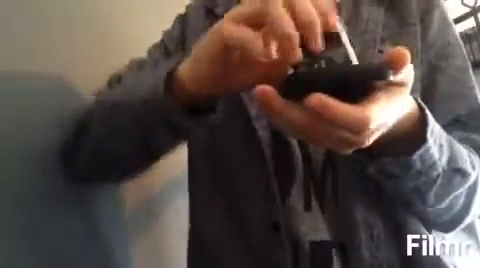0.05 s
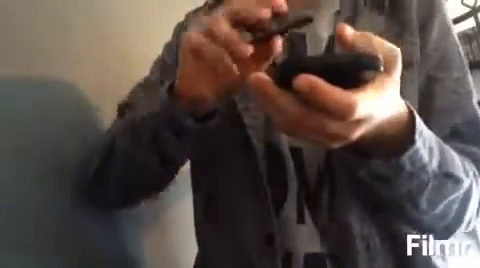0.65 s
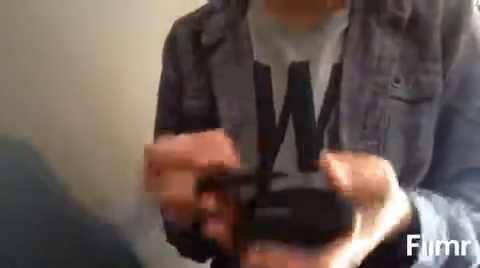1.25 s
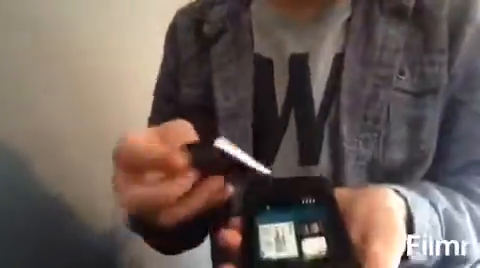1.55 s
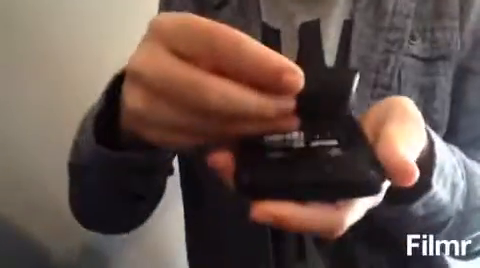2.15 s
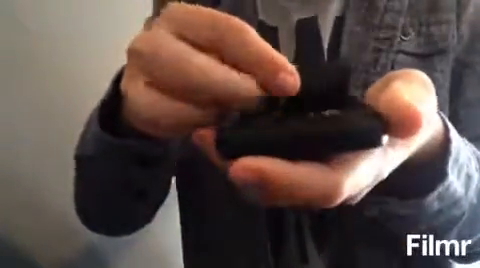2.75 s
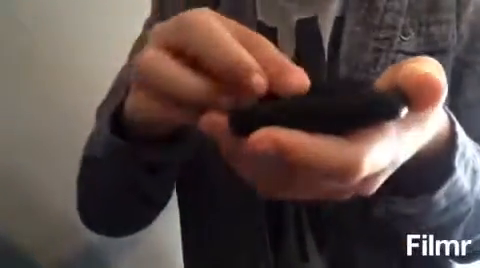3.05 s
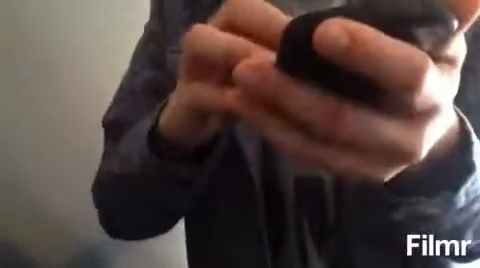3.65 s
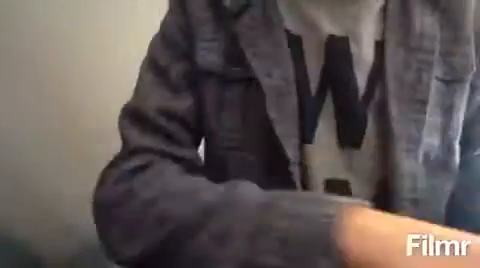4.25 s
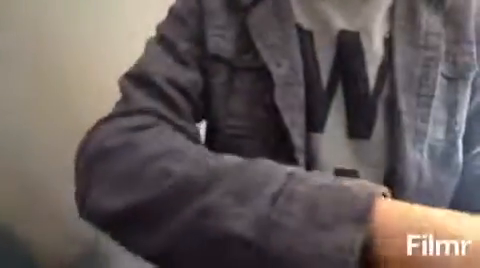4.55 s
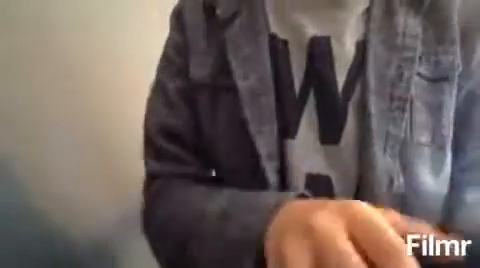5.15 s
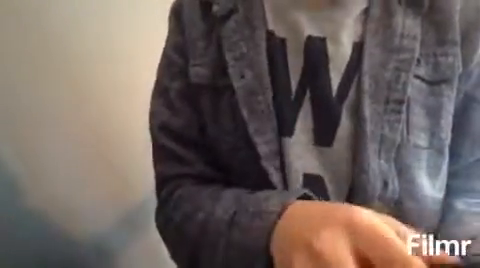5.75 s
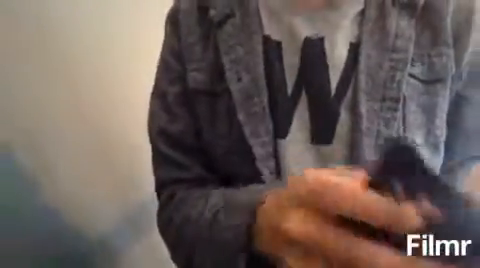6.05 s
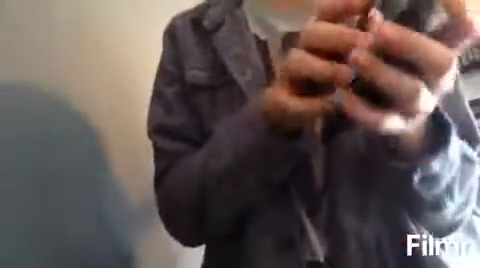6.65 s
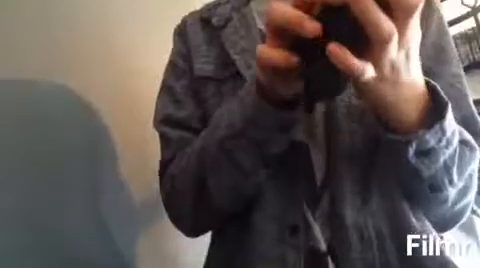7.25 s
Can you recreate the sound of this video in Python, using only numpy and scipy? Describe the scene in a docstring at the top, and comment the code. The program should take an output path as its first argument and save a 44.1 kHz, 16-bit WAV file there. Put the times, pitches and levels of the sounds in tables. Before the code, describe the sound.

Hands handle a phone close to the microphone in a small room, over faint steady hiss and rumble. A light plastic tick comes right at the start. The back cover snaps into place at about 1.1, 2.5, 3.1 and 3.4 seconds, with small ticks between and a duller click near 2.7. From 4.2 to 5 seconds a sleeve rustles faintly, an arm bumps the table softly at 4.4, and fingernails graze the plastic around 4.9. At about 5.15 the phone lands with a loud knock and quick clatter, the loudest moment, while its case scrapes across the table in jerky, rattling pulls. Softer scrapes and bumps continue until about 6 seconds. The hiss dips after the knocks and slowly recovers. From 6.7 to 7.4 seconds there are a few light finger grazes and plastic clicks.

```python
"""In a small room, hands press the back cover of a phone until its catches snap and ring its modes.
Plastic contacts tick, a sleeve rustles by friction, fingers graze the shell and an arm bumps a table.
The phone lands and excites the table's modes; its case is dragged off the top in stick-slip motion.
The walls reflect these sounds over a floor of hiss and rumble. A gain control lowers everything,
hiss included, after the loud knocks and slowly recovers."""
import sys
import numpy as np
from scipy import signal
from scipy.fft import rfft, irfft, next_fast_len
from scipy.io import wavfile

SR = 44100
rng = np.random.default_rng(int(sys.argv[2]) if len(sys.argv) > 2 else 0)


def int16_out(signal):
    """Quantize to a 16-bit WAV file."""
    q = np.round(np.clip(np.atleast_2d(signal).T, -1, 1) * 32767)
    wavfile.write(sys.argv[1], SR, q.astype(np.int16))


N = 330309
TIME = np.arange(N) / SR
HIT_TIME = TIME[:16384]


def undb(db):
    """Decibels to amplitude ratio."""
    return 10 ** (np.asarray(db) / 20)


def unit(x):
    """Normalisation to rms 1."""
    return x / np.sqrt(np.mean(x ** 2))


def add(out, s, x):
    """Superposition: x joins out at time s."""
    i = int(s * SR)
    out[i:i + len(x)] += x[:N - i]


def colour(x, points):
    """Minimum-phase filter through (frequency [Hz], gain [dB]) points; white noise keeps its power."""
    size = 4096
    hz, db = np.transpose(points)
    bin_hz = np.arange(size // 2 + 1) * SR / size
    gain = undb(np.interp(np.log(bin_hz + 1), np.log(hz), db))
    cepstrum = irfft(np.log(unit(gain)))
    cepstrum[1:size // 2] *= 2  # folding the cepstrum makes the filter causal
    cepstrum[size // 2 + 1:] = 0
    return signal.fftconvolve(x, irfft(np.exp(rfft(cepstrum))))[:len(x)]


def lowpass(x, hz, order=2):
    """Maximally flat low-pass."""
    return signal.sosfilt(signal.butter(order, min(hz, SR / 2 - 1), fs=SR, output="sos"), x)


def highpass(x, hz, order=2):
    """Maximally flat high-pass."""
    return signal.sosfilt(signal.butter(order, hz, "high", fs=SR, output="sos"), x)


def shelves(x, low_db, high_db, low_hz=1000, high_hz=3200):
    """Zero-phase shelving: bass and treble are scaled about an unchanged middle band."""
    size = next_fast_len(len(x) + 2048)
    hz, spectrum = np.arange(size // 2 + 1) * SR / size, rfft(x, size)
    low, below = (irfft(spectrum / (1 + (hz / edge) ** 6), size)[:len(x)] for edge in (low_hz, high_hz))
    return low * undb(low_db) + below - low + (x - below) * undb(high_db)


def resonate(x, peaks):
    """Forced vibration: x drives resonances of (frequency [Hz], bandwidth [Hz], gain [dB])."""
    return sum(undb(db) * signal.lfilter(*signal.iirpeak(hz, hz / width, fs=SR), x)
               for hz, width, db in peaks)


def ring(modes, pitch=1):
    """Free vibration: modes struck once decay exponentially."""
    return sum(undb(db) * np.sin(2 * np.pi * hz * pitch * HIT_TIME)
               * np.exp(-np.log(1000) * HIT_TIME / t60) for hz, t60, db in modes)


def crack(fall_s):
    """Exponential decay: a burst of noise that dies away, with energy 1."""
    burst = rng.standard_normal(len(HIT_TIME)) * np.exp(-HIT_TIME / fall_s)
    return burst / np.linalg.norm(burst)


def grains(rate, spread_db):
    """Stick-slip friction: random impulses of unequal size, rms 1."""
    impulses = (rng.random(N) < rate / SR) * rng.standard_normal(N)
    return unit(impulses * undb(spread_db * np.minimum(rng.exponential(size=N), 4)))


def stroke(start_s, attack_s, release_s, release_power=2.22):
    """Force envelope of a hand movement: a linear rise, then a power-law release."""
    t = TIME - start_s
    return np.clip(t / attack_s, 0, 1) * np.clip(1 - (t - attack_s) / release_s, 0, 1) ** release_power


def strokes(table):
    """Superposition of the force envelopes of several movements."""
    return sum(undb(db) * stroke(s, attack_s, release_s) for s, db, attack_s, release_s in table)


# background spectrum: (frequency [Hz], level [dB])
FLOOR_SPECTRUM = [(15, -59.5), (25, -23.5), (39, -14), (59, 2), (82, -5), (183, -5), (305, -12.5),
                  (340, -12.5), (482, -14.5), (703, -19.5), (2170, -21), (2360, -19.5), (5010, -17.5),
                  (14300, -19), (15500, -20.5)]

def noise_floor(level_db=-67):
    """Stationary noise: steady hiss and rumble."""
    return undb(level_db) * unit(colour(rng.standard_normal(N), FLOOR_SPECTRUM))


# spectrum of a plastic contact: (frequency [Hz], level [dB])
PLASTIC_SPECTRUM = [(100, -32), (260, -4), (650, -0.5), (1350, -6), (1850, 2.5), (2500, -2.5), (3200, -10),
                    (4300, -7), (7000, -15), (10000, -25), (15000, -32)]
# resonances of the shell and the hollow of the palm: (frequency [Hz], bandwidth [Hz], gain [dB])
SHELL_RESONANCES = [(352.3, 44, 3), (615, 7, 14), (1785, 96, 7), (2560, 230, -10), (4050, 310, 4)]
# small plastic contacts: (time [s], level [dB], bass [dB], treble [dB])
TICKS = [(0.127, -33, 2, -0.5), (1.9385, -48.5, 19.5, 6), (2.2899, -38.5, 6.5, -11),
         (2.338, -46, 10.5, -17), (2.4657, -30.5, -28, -5), (2.7382, -28.5, -14, 9.5),
         (2.74, -19.5, -4.5, -29), (3.347, -45, 8, -7), (3.7944, -55, 8.5, 3), (3.861, -62, 19.5, -6),
         (4.2161, -53.5, 12.5, -11), (4.4594, -46, 15, -5), (4.476, -45.5, -2, 5), (4.7681, -44, -1, 7),
         (5.7506, -33.5, -8, -11), (6.112, -45, 0, 4.5), (7.256, -37.5, -8.5, 0.5),
         (7.393, -41, -10.5, -10), (7.4092, -34.5, -1, 9.5)]

def ticks(fall_s=0.0034, chatter_db=6, strike_db=3, lead_db=-8, lead_s=0.0047):
    """Impact excitation: plastic rubs briefly, strikes and chatters, driving the shell's resonances."""
    contact = np.zeros(N)
    for s, db, low_db, high_db in TICKS:
        push = undb(chatter_db) * crack(fall_s)
        push[0] += undb(strike_db)
        lead = undb(lead_db) * crack(lead_s)[:1024][::-1]
        add(contact, s - len(lead) / SR, undb(db) * shelves(np.r_[lead, push], low_db, high_db))
    return colour(contact, PLASTIC_SPECTRUM) + resonate(contact, SHELL_RESONANCES)


# modes of the hand-held cover: (frequency [Hz], T60 [s], level [dB])
COVER_MODES = [(643, 0.052, -17), (1084, 0.02, -9.5), (1230, 0.039, -25), (1182, 0.012, -2),
               (1365, 0.2, -28.5), (1487, 0.017, -12), (1684, 0.013, 1.5)]
# catches closing: (time [s], level [dB], pitch [ratio], damping cutoff [Hz], edge [dB], room send [dB])
SNAPS = [(1.0750, -19, 1.06, 1530, -5, 0.5), (2.4673, -25, 1.05, 2320, 4, -2),
         (3.1303, -24, 1.02, 1800, -6.5, -4), (3.4307, -23.5, 1.04, 1870, -4.5, -6.5)]

def snaps(band_ratio=2.27, edge_s=0.0048, swell_db=-8, swell_s=0.0044, swell_hz=1600):
    """Elastic release: a catch lets go and rings the cover. Returns direct sound and room send."""
    direct, to_walls = np.zeros((2, N))
    for s, db, pitch, cutoff_hz, edge_db, room_db in SNAPS:
        body = lowpass(ring(COVER_MODES, pitch), cutoff_hz, order=6)  # fingers damp the treble
        body = highpass(body, cutoff_hz / band_ratio, order=3)  # a small cover radiates little bass
        body /= np.abs(body).max()
        burst = crack(edge_s) * (1 - np.exp(-HIT_TIME / 0.00059))
        edge = undb(edge_db) * highpass(colour(burst, PLASTIC_SPECTRUM), 1500)
        # a brief swell near 1.6 kHz leads into each snap
        rise = signal.fftconvolve(crack(swell_s)[::-1], body)
        swell = resonate(rise, [(swell_hz, 600, swell_db)])
        add(direct, s - len(HIT_TIME) / SR, undb(db) * swell)
        add(direct, s, undb(db) * (body + edge))
        add(to_walls, s, undb(db + room_db) * (body + undb(5.5) * edge))
    return direct, to_walls


# spectrum of rubbing cloth: (frequency [Hz], level [dB])
CLOTH_SPECTRUM = [(35, -45.5), (60, -8.5), (194, -2.5), (346, -1.5), (493, 1.5), (719, -9), (938, -5),
                  (1170, -14), (2230, -11.5), (2550, -10.5), (2970, -28), (4330, -13.5), (12000, -36),
                  (15600, -61)]
# resonances of sleeve and cuff: (frequency [Hz], bandwidth [Hz], gain [dB])
CUFF_RESONANCES = [(920, 30, -4.5), (1470, 60, -4.5), (1959, 170, -4.5), (2490, 170, -1.5), (3420, 66, -3),
                   (5245, 100, -5), (6340, 200, -8.5)]
# sleeve movements: (time [s], level [dB], attack [s], release [s])
SLEEVE_STROKES = [(2.18, -68.5, 0.094, 0.89), (4.19, -70, .04, 0.28), (4.37, -63.5, 0.091, 0.22),
                  (4.48, -62.5, 0.18, 0.46), (4.74, -58, 0.026, 0.064), (4.89, -66, 0.045, 0.16)]

def sleeve():
    """Friction noise: cloth fibres catch and slip as the arm reaches out."""
    fibres = grains(rate=3500, spread_db=3.5)
    rustle = colour(fibres, CLOTH_SPECTRUM) + undb(9) * resonate(fibres, CUFF_RESONANCES)
    return undb(-3.5) * strokes(SLEEVE_STROKES) * rustle


# fingertips and nails on the shell: (time [s], level [dB], resonance [Hz], decay time [s])
GRAZES = [(2.843, -40.5, 2530, .005), (4.9048, -37.5, 2090, .006), (4.926, -38, 2100, 0.0059),
          (4.941, -27.5, 2028, .008), (6.7078, -37, 2057, 0.0032), (6.9657, -44, 2030, 0.0044),
          (7.113, -38.5, 2090, 0.0023), (7.1953, -43.5, 2110, .004)]

def grazes(rub_db=-8, ring_db=18, width_hz=220, thin_hz=1100):
    """Selective resonance: a finger's light slip favours one resonance of the shell and has no bass."""
    out = np.zeros(N)
    for s, db, hz, fall_s in GRAZES:
        slip = crack(fall_s)
        rub = undb(rub_db) * colour(slip, PLASTIC_SPECTRUM)
        add(out, s, undb(db) * highpass(rub + resonate(slip, [(hz, width_hz, ring_db)]), thin_hz))
    return out


# spectrum of the bumped table: (frequency [Hz], level [dB])
RUMBLE_SPECTRUM = [(20, -3), (60, 4), (130, -1.5), (210, -1.5), (350, -17), (900, -42)]
# arm and hand meeting the table: (time [s], level [dB], attack [s], release [s])
BUMPS = [(4.358, -46, 0.034, 0.057), (4.43, -54.5, .035, 0.083)]

def bumps():
    """Soft impact: arm and hand excite a low rumble in the table."""
    return strokes(BUMPS) * colour(rng.standard_normal(N), RUMBLE_SPECTRUM)


# pulls of the case: (time [s], level [dB], attack [s], release [s], bass [dB], treble [dB])
DRAGS = [(5.08, -35, 0.031, 0.25, -4, -6), (5.15, -23.5, .09, .23, -7.5, -6),
         (5.31, -37.5, 0.083, 0.18, 0, -9), (5.505, -38, 0.027, 0.1, 2, -14),
         (5.61, -63, 0.054, 0.52, 9, -11), (5.69, -54.5, 0.087, .07, -19, -5),
         (5.838, -37.5, 0.034, 0.18, -0.5, -8.5), (5.92, -66.5, 0.028, 0.12, -14, 8),
         (6.039, -61, 0.04, 0.098, -2.5, 1)]

def drags(rattle_db=-7, dulling_db_per_db=0.25):
    """Sliding friction: the rattling force under the pulled case, which dulls as each pull eases."""
    friction = grains(rate=5000, spread_db=2) + undb(rattle_db) * grains(rate=160, spread_db=1)
    force = np.zeros(N)
    for s, db, attack_s, release_s, low_db, high_db in DRAGS:
        span = slice(int(s * SR), int((s + attack_s + release_s) * SR))
        pull = stroke(s, attack_s, release_s)[span]
        dulling_db = dulling_db_per_db * 20 * np.log10(pull + 1e-6)
        add(force, s, undb(db) * shelves(pull * friction[span], low_db, high_db + dulling_db))
    return force


# edges skidding on the table:
# (time [s], level [dB], decay time [s], bass [dB], treble [dB], squeak [Hz], squeak gain [dB])
SKIDS = [(5.0948, -30, 0.0071, -8, 4, 1604, 27), (5.197, -23.5, 0.0066, -8, -17, 2640, 23),
         (5.214, -22, 0.0058, 2.5, 1.5, 4352, 20), (5.2341, -13.5, 0.009, -1.5, -1.5, 1217, 23.5),
         (5.3259, -26.5, 0.007, -7, -5.5, 2090, 22), (5.348, -28.5, 0.021, -2, -7.5, 491, 16.5),
         (5.768, -37, 0.0053, -20, -10.5, 2320, 20), (5.866, -30.5, 0.0051, -6, -7, 673, 27),
         (5.8757, -28.5, 0.0083, -17, 0.5, 1350, 22.5)]

def skids(rise_share=0.57, squeak_width_hz=45):
    """Stick-slip bursts: each skidding edge drives a resonance of its own. Returns force and squeaks."""
    slips = grains(rate=14000, spread_db=-5)
    t = HIT_TIME - HIT_TIME[-1] / 2  # zero at the peak of a skid
    force, squeaks = np.zeros((2, N))
    for s, db, fall_s, low_db, high_db, squeak_hz, squeak_db in SKIDS:
        start_s = s + t[0]
        i = int(start_s * SR)
        envelope = np.exp(np.minimum(t / rise_share, -t) / fall_s)
        burst = undb(db) * slips[i:i + len(t)] * envelope
        add(force, start_s, shelves(burst, low_db, high_db))
        add(squeaks, start_s, resonate(burst, [(squeak_hz, squeak_width_hz, squeak_db)]))
    return force, squeaks


# spectrum of the case scraping the table: (frequency [Hz], level [dB])
SCRAPE_SPECTRUM = [(35, -43), (60, -12.5), (135, -3), (272, -1), (368, -4.5), (559, -5.5), (657, -7.5),
                   (1100, -5.5), (1230, -15), (1520, -10.5), (2530, -10.5), (2910, -26), (3580, -12.5),
                   (5320, -18), (15500, -46)]
# resonances of the case: (frequency [Hz], bandwidth [Hz], gain [dB])
CASE_RESONANCES = [(377, 7, 3), (429.8, 18, 0), (482.1, 14, -5), (655, 21, 0.5), (860, 84, -5),
                   (1235, 43, -6.5), (1340, 25, -9.5), (1626, 25, -5), (1900, 130, -11.5), (2280, 100, -11),
                   (2540, 110, -11.5), (3570, 130, -13), (4330, 130, -10.5), (5231, 60, -9.5),
                   (5920, 70, -14), (7130, 30, -15.5)]
# corners of the case striking the table: (time [s], level [dB])
CLACKS = [(5.2141, -6), (5.2317, -3), (5.2391, -14), (5.2484, -5), (5.263, -14.5), (5.325, -32),
          (5.353, -21), (5.374, -19)]

def scrape(ring_db=16, lift_s=6.09):
    """Forced vibration: drags, skids and clacks drive the case; the case rings on briefly as it lifts off the
    table."""
    drag_force = drags()
    skid_force, squeaks = skids()
    force = drag_force + skid_force
    for s, db in CLACKS:
        force[int(s * SR)] += undb(db)
    out = colour(force, SCRAPE_SPECTRUM) + undb(ring_db) * resonate(force, CASE_RESONANCES) + squeaks
    fade = np.sqrt(1 - HIT_TIME / HIT_TIME[-1])
    add(out, lift_s, ring([(491, 1.15, -64)]) * fade)
    return undb(-3.5) * out


# modes of the table top: (frequency [Hz], T60 [s], level [dB])
TABLE_MODES = [(131.4, 0.396, -28.5), (208, 0.088, -12.5), (391, 0.7, -40), (420, 0.15, -35),
               (510, .06, -14), (638.5, 0.02514, -4.5), (830, 0.014, 0), (873, 0.31, -25.5),
               (1316, 0.27, -33), (1560, .012, -10)]
# phone and case landing and rocking on their flat sides: (time [s], level [dB], contact time [s])
THUDS = [(5.1471, 0, 0.000098), (5.1496, -2, 0.00095), (5.1537, -3, 0.0008), (5.2313, -3, 0.00034),
         (5.2341, -12.5, 0.00041), (5.802, -42, 0.0023), (5.893, -41, 0.0015), (5.928, -46, 0.0018)]

def thuds(edge_db=-3, edge_s=0.0031, radiate_hz=130, hard_s=0.0011):
    """Impact on a plate: a half-sine force rings the table; the longer the contact, the duller the blow."""
    out = np.zeros(N)
    for s, db, contact_s in THUDS:
        push = np.sin(np.pi * np.minimum(HIT_TIME / contact_s, 1))
        vibration = signal.fftconvolve(push, ring(TABLE_MODES))[:len(push)]
        body = highpass(vibration, radiate_hz)  # the board radiates little deep bass
        hardness = min(hard_s / contact_s, 1)
        edge = undb(edge_db) * hardness * colour(crack(edge_s), PLASTIC_SPECTRUM)
        add(out, s, undb(db) * (body / np.abs(body).max() + edge))
    return out


def room(x, wet_db, mid_t60, low_t60=0.4, high_t60=0.12, gap_s=0.0058, high_db=-4):
    """Reverberation: separate early reflections thicken into a short tail whose bass lasts longest."""
    t = TIME[:SR // 2]
    density = np.minimum(0.032 + (t / 0.07) ** 2, 1)
    arrivals = (rng.random(len(t)) < density) * (t > gap_s)
    echoes = arrivals * rng.choice([-1, 1], len(t)) / np.sqrt(density)
    low, below = lowpass(echoes, 310), lowpass(echoes, 2300, order=1)
    fade_low, fade_mid, fade_high = (np.exp(-np.log(1000) * t / t60)
                                     for t60 in (low_t60, mid_t60, high_t60))
    tail = low * fade_low + (below - low) * fade_mid + undb(high_db) * (echoes - below) * fade_high
    return undb(wet_db) * signal.fftconvolve(x, tail / np.linalg.norm(echoes * fade_mid))[:N]


def scene():
    """Superposition: direct sound of hands and table, their reflections and the noise floor, in mono."""
    snap, snap_to_walls = snaps()
    handling = ticks() + grazes() + sleeve() + bumps()
    table = thuds() + scrape()
    # body and jacket shade the sound that the hands send towards the walls
    to_walls = snap_to_walls + undb(2) * handling
    shaded = shelves(to_walls, low_db=-5, high_db=-6.5, low_hz=1080, high_hz=1750)
    walls = room(shaded, wet_db=0, mid_t60=0.25) + room(table, wet_db=-8.5, mid_t60=0.21)
    return (snap + handling + table + walls + noise_floor())[None]


def record(dry, knee_db=-12, duck_share=0.3, ceiling=0.75, top_hz=15400):
    """Automatic gain control: gain drops on peaks and creeps back; soft clipping and a low-pass follow."""
    over_db = np.maximum(20 * np.log10(np.abs(dry[0]) + 1e-9) - knee_db, 0)
    leak_db = 6.5 * TIME  # the held peak falls steadily
    held_db = np.maximum.accumulate(over_db + leak_db) - leak_db
    gain = undb(-duck_share * lowpass(held_db, 60, order=1))
    rounded = ceiling * np.tanh(dry * gain / ceiling)
    return signal.sosfilt(signal.ellip(10, 0.1, 70, top_hz, fs=SR, output="sos"), rounded)


dry = scene()
out = record(dry)
int16_out(out)
```